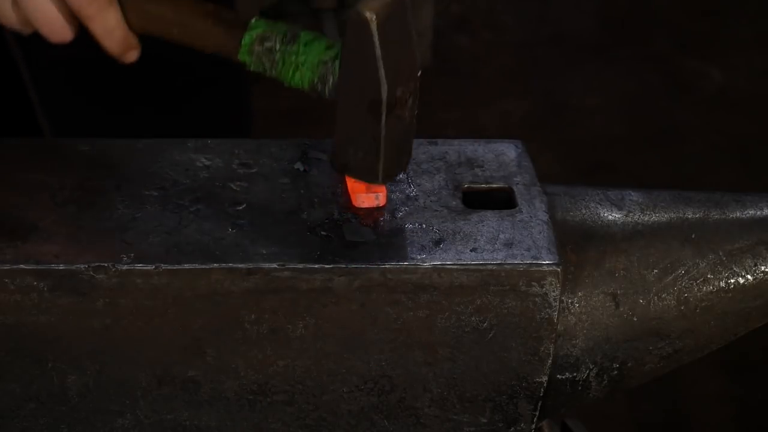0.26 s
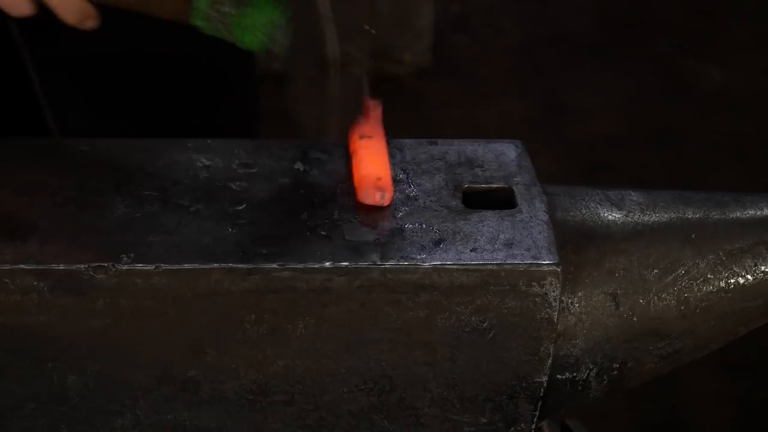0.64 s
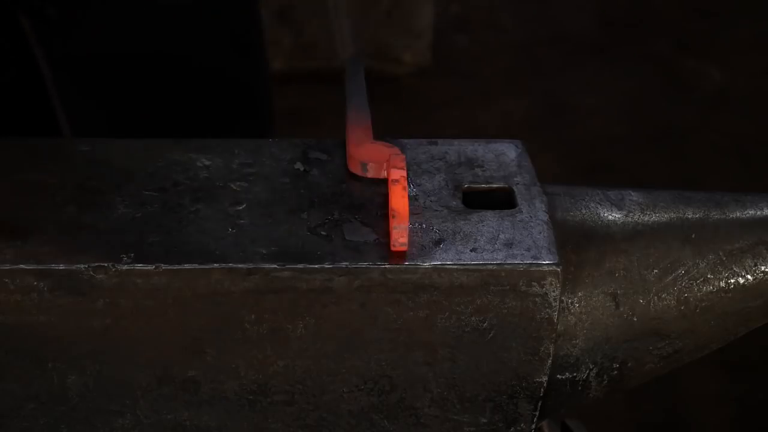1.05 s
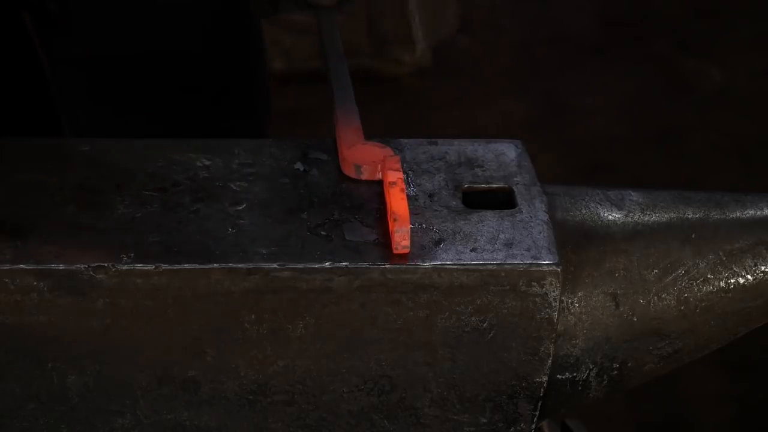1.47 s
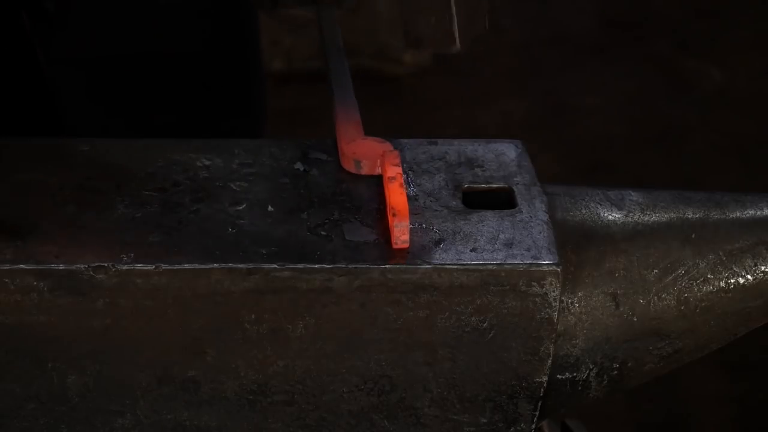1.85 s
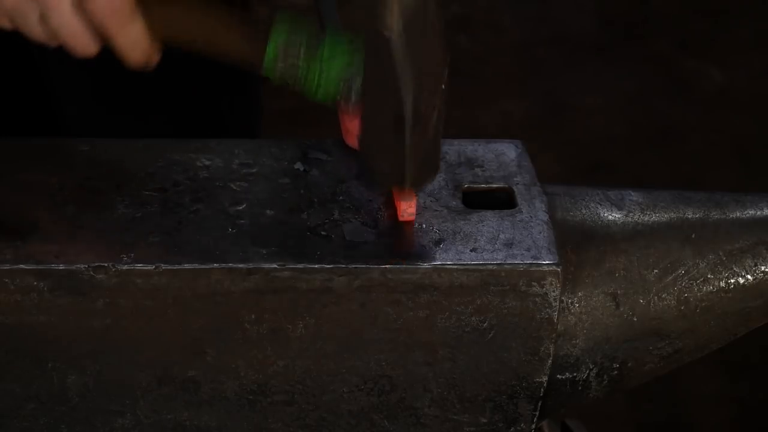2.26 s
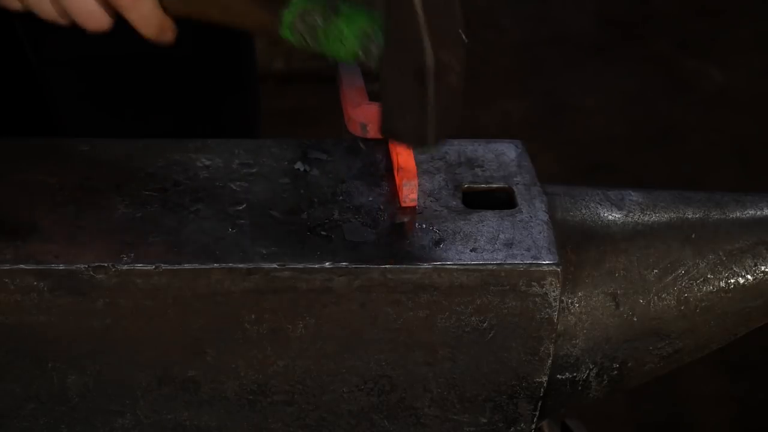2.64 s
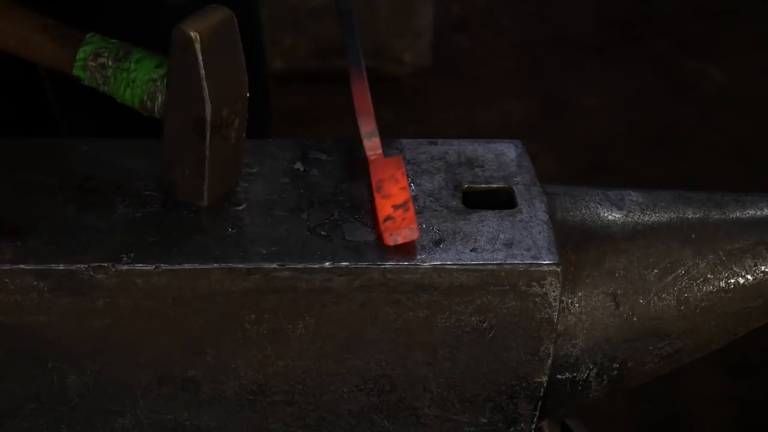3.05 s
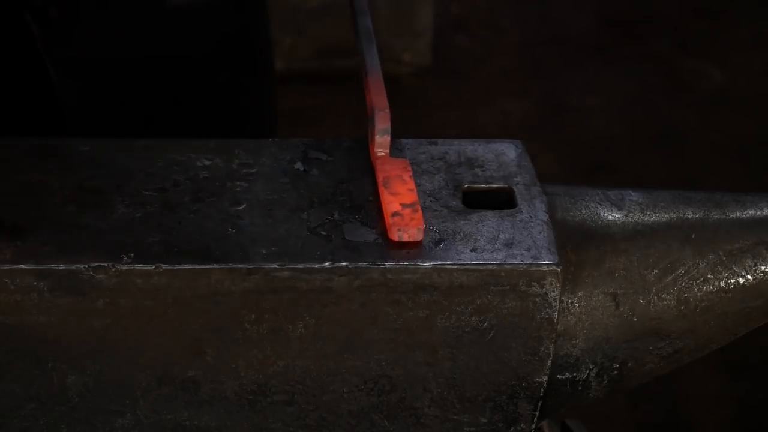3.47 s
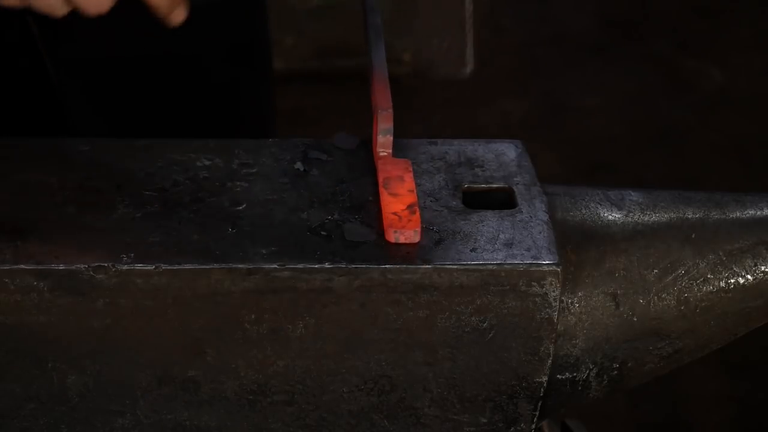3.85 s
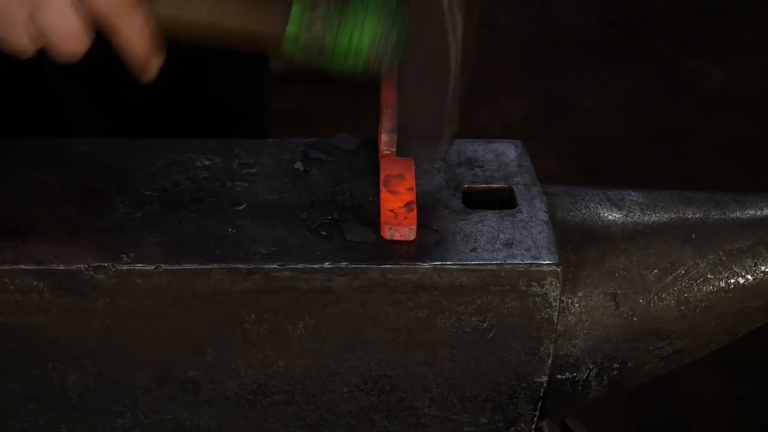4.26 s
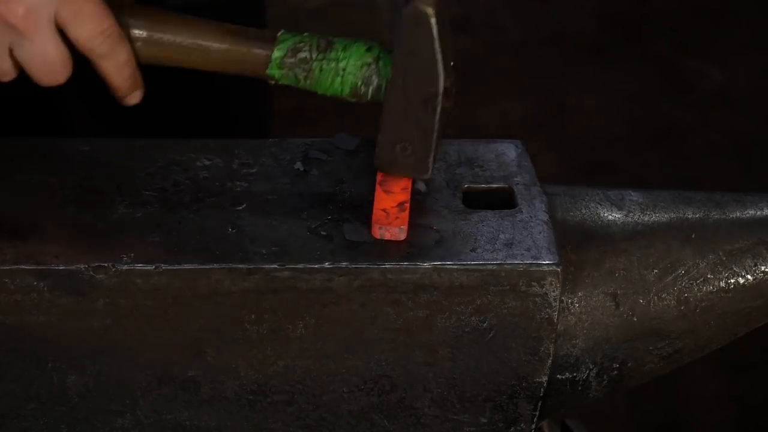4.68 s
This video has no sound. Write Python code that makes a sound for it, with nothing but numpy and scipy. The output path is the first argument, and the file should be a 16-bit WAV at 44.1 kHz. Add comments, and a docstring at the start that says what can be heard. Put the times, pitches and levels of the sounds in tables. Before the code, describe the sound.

Close, crisp hammer blows crack and clink on a glowing bar over an anvil, with short metallic ringing and quick hammer bounces in a live workshop.

```python
"""Forging at the anvil

A smith forges a glowing bar on an anvil, close to the microphone, in a fairly live workshop.
Each blow is a filtered pulse (knock), damped low modes (thud), coloured noise (crack of scale)
and a short chattering tone (clank of the pinched bar); then the anvil's modes ring.
Between runs of blows the hammer drops and bounces on the bare face, and the bar touches down.
Behind it lie low room noise, a wavering hum and one faint swell of hiss."""
import sys
import numpy as np
from scipy import signal
from scipy.fft import rfft, irfft
from scipy.io import wavfile
from scipy.ndimage import uniform_filter1d

SR = 44100
rng = np.random.default_rng(int(sys.argv[2]) if len(sys.argv) > 2 else 0)


def transcribe(u):
    """Save the signal u as a 16-bit wav file named by the first command-line argument.

    u: samples, shape (n,) or (channels, n), limited to [-1, 1]; the rate is SR.
    q: integer samples, one column per channel.
    """
    v = np.clip(np.atleast_2d(u).T, -1, 1)
    q = np.round(v * 32767).astype(np.int16)
    wavfile.write(sys.argv[1], SR, q)


N = 216619
LEAD = SR // 4  # samples kept ahead of the start, so that an earlier blow can ring into it

# spectrum of the steady workshop noise, before it is set to FLOOR_DB
# columns: frequency_hz, relative_level_db (per Hz)
FLOOR_SPECTRUM = [(25, -20.5), (45, -13.5), (75, -3), (160, -9.5), (280, -5), (520, -4.5), (1000, -12),
                  (2000, -25), (5000, -31.5), (10000, -38.5), (16000, -50)]
FLOOR_DB = -59.5  # rms


def undb(db):
    """Decibels to gain."""
    return 10 ** (np.asarray(db) / 20)


def on_log_axis(table, hz):
    """Read a spectrum between its frequencies, on a logarithmic frequency axis."""
    table = np.array(table, float)
    return np.interp(np.log(np.maximum(hz, 1)), np.log(table[:, 0]), table[:, 1])


def colour(x, table, tilt_db=0):
    """Causal minimum-phase filter with the given spectrum, tilted above 6 kHz by dB per octave."""
    size = 2048
    hz = np.maximum(np.fft.rfftfreq(size, 1 / SR), 20)
    octaves = np.log2(np.maximum(hz / 6000, 1))
    gain = undb(on_log_axis(table, hz) + tilt_db * octaves)
    # folding the cepstrum onto positive times makes the filter causal
    cepstrum = irfft(np.log(gain))
    cepstrum[1:size // 2] *= 2
    cepstrum[size // 2 + 1:] = 0
    response = irfft(np.exp(rfft(cepstrum)))
    return signal.fftconvolve(x, response)[:len(x)]


def burst(x, db):
    """Give a short sound the energy of 10 ms at this rms level."""
    return x * undb(db) * np.sqrt(SR / 10 ** 2 / np.sum(x ** 2))


def steady(x, db):
    """Give a lasting sound this rms level."""
    return x * undb(db) / np.std(x)


def fade(t, t60):
    """Exponential decay by 60 dB in t60 seconds."""
    return np.exp(-np.log(1000) * t / np.maximum(t60, 1e-4))


def ring(t, hz, t60, db, phase=0):
    """A sum of decaying modes, each a damped sine."""
    hz, t60, db, phase = (np.reshape(v, (-1, 1)) for v in (hz, t60, db, phase))
    return np.sum(undb(db) * fade(t, t60) * np.sin(2 * np.pi * hz * t + phase), axis=0)


def add(out, s, sound):
    """Mix a sound in at its time in seconds."""
    start = LEAD + int(s * SR)
    out[:, start:start + sound.shape[1]] += sound


def background(waver=0.43):
    """Low room noise, a hum whose level wavers, and a faint high hiss that swells and fades once."""
    # spectrum of the hiss; columns: frequency_hz, relative_level_db
    hiss_spectrum = [(2000, -16), (5000, -11.5), (8500, -7.5), (13500, -3.5), (16000, -18)]
    hum_hz, hum_db = 61, -66
    peak_s, peak_db, rise_db_per_s, fall_db_per_s = 1.97, -63.5, 109, 34.5
    t = np.arange(N) / SR
    swell = 1 + waver * signal.resample(rng.standard_normal(size=50), N)
    hum = steady(swell * np.sin(2 * np.pi * hum_hz * t), hum_db)
    hiss_db = peak_db - np.maximum(rise_db_per_s * (peak_s - t), fall_db_per_s * (t - peak_s))
    hiss = steady(colour(rng.standard_normal(N), hiss_spectrum), hiss_db)
    # the filter settles during the lead
    floor = steady(colour(rng.standard_normal(LEAD + N), FLOOR_SPECTRUM)[LEAD:], FLOOR_DB)
    return floor + hum + hiss


def workshop(x, build_s=0.0033):
    """Diffuse sound from the walls builds up quickly and decays by bands; two standing waves join in."""
    # reverberation bands; columns: centre_hz, t60_s, energy_db (against the sound sent in)
    room_bands = [(118.8, 1.2, -18.5), (300, 1.4, -14.5), (463, 0.783, -27.5), (700, 0.46, -18.5),
                  (1256, 0.8, -21.5), (2110, 0.75, -22.5), (4310, 0.51, -12), (8240, 0.36, -19.5),
                  (13880, 0.11, -17.5)]
    # standing waves; columns: frequency_hz, t60_s, energy_db (against the sound sent in)
    standing_waves = [(483, 1, -43.5), (528, 1, -37)]
    t = np.arange(SR) / SR
    hz = np.fft.rfftfreq(SR, 1 / SR)
    noise, response = rfft(rng.standard_normal(SR)), 0
    centres = np.log([row[0] for row in room_bands])
    # each row of the identity matrix gives one band that overlaps only its neighbours
    for share, (_, t60, db) in zip(np.eye(len(room_bands)), room_bands):
        band = irfft(noise * np.interp(np.log(hz + 1), centres, share), SR)
        shape = fade(t, t60) * (1 - np.exp(-(t / build_s) ** 2))
        response = response + undb(db) * band * shape / np.linalg.norm(shape)
    for mode_hz, t60, db in standing_waves:
        wave = ring(t, mode_hz, t60, 0)
        response = response + undb(db) * wave / np.linalg.norm(wave)
    return signal.fftconvolve(x, response)[:len(x)]


def near_echoes(sharp):
    """Knock and crack return, duller, from things close by and from a wall."""
    # columns: delay_s, gain
    reflections = [(.00305, 0.27), (.00432, -0.15), (.0054, -0.18), (0.037, .04)]
    dull = uniform_filter1d(sharp, size=14)
    return sum(gain * np.roll(dull, int(delay * SR)) for delay, gain in reflections)


def rattle(t, pulse, t60=0.024, db=-11.0):
    """Tongs, bar and stand shake for a moment after the knock: fading noise stirred by the pulse."""
    shake = rng.standard_normal(len(t)) * fade(t, t60) * np.clip(t / 0.0015, 0, 1)
    return undb(db) * signal.fftconvolve(pulse, shake / np.linalg.norm(shake))[:len(t)]


def shimmer(t, hz, db=-39, t60=0.38, scatter_db=4):
    """The many weak upper modes of anvil and hammer, woken by the crack."""
    mode_db = db + scatter_db * rng.standard_normal(len(hz))
    return ring(t, hz, t60, mode_db, rng.uniform(0, 2 * np.pi, len(hz)))


def thud(t):
    """The anvil on its stand sways in low, quickly damped modes."""
    # columns: frequency_hz, t60_s, relative_level_db
    stand_modes = [(112, 0.045, -6), (296, .04, 5), (474, 0.048, 10.5), (664, 0.021, 1)]
    return ring(t, *np.transpose(stand_modes), phase=0.86)


def anvil(t, spot, hold, scatter_db=0.5, treble_db=4.0):
    """The place of the blow decides how strongly each mode rings; hold scales how long."""
    # anvil modes before scatter, treble lift and hold; columns: frequency_hz, t60_s,
    # relative level_db struck at spot -1 (bare face), at 0 (under the bar), at 1 (nearer the horn)
    anvil_modes = [(1461, .36, -40, -51, -54), (2761, .33, -57, -53, -55), (3356, .28, -53, -58, -45),
                   (3464, .2, -30, -39, -43), (3632, .31, -37, -36, -23), (4140, .26, -49, -51, -41),
                   (4298, .3, -58, -53, -60), (5108, .19, -26, -50, -41), (6521, .33, -54, -59, -61),
                   (6705, .3, -52, -65, -53), (6925, .33, -64, -58, -51), (7105, .27, -51, -63, -54),
                   (7612, .22, -48, -59, -50), (8030, .35, -67, -60, -62), (8626, .23, -56, -58, -48),
                   (9595, .4, -67, -66, -64), (10215, .33, -66, -56, -42), (10412, .27, -73, -57, -41),
                   (10720, .05, -40, -60, -55), (10850, .3, -63, -63, -46), (12254, .33, -65, -60, -55),
                   (12405, .35, -68, -66, -58), (13062, .35, -79, -61, -69), (13436, .28, -62, -60, -58),
                   (13592, .3, -69, -66, -54)]
    hz, t60, *spots_db = np.transpose(anvil_modes)
    db = np.array([np.interp(spot, [-1, 0, 1], row) for row in np.transpose(spots_db)])
    # the weak modes, struck near their nodes, vary most from blow to blow
    db = db + scatter_db * rng.standard_normal(len(hz)) * np.clip((db.max() - db) / 10, 0, 2)
    db = db + np.interp(hz, [4000, 8000], [0, treble_db])
    return ring(t, hz, t60 * hold, db, rng.uniform(0, 2 * np.pi, len(hz)))


def clank(t, hz, t60=0.02, rough=0.4):
    """The bar, pinched between hammer and anvil, rings briefly and chatters."""
    chatter = 1 + rough * steady(uniform_filter1d(rng.standard_normal(len(t)), size=40), 0)
    return chatter * ring(t, hz, t60, 0)


def crack(t, hz, tilt_db, snap_t60=0.0082, crumble_t60=0.024, crumble_db=-8, focus=2.73, q=1.6):
    """Scale snaps and crumbles: fading noise, stressed around one broad resonance."""
    # spectrum of crushed scale; columns: frequency_hz, relative_level_db
    scale_spectrum = [(1000, -9), (2800, 2.5), (4200, 6), (5200, 8), (6500, 2), (10000, 0.5), (13500, -6),
                      (16000, -22)]
    envelope = fade(t, snap_t60) + undb(crumble_db) * fade(t, crumble_t60)
    grit = rng.standard_normal(len(t)) * envelope
    grit = grit + focus * signal.lfilter(*signal.iirpeak(hz, q, fs=SR), grit)
    return colour(grit, scale_spectrum, tilt_db)


def knock(t, contact_ms):
    """One pressure pulse as the hammer head stops; a longer contact makes it duller."""
    # spectrum of the stopping head; columns: frequency_hz, relative_level_db
    knock_spectrum = [(60, -29.5), (300, -8), (900, 0.5), (1400, 2.5), (2000, 2.5), (2450, 1), (2850, -6),
                      (3900, -1), (6000, -29), (16000, -41)]
    return colour(np.exp(-t * 10 ** 3 / contact_ms), knock_spectrum)


def strike(t, upper_hz, strength_db, contact_ms, scale_db, tilt_db, spot, crack_hz, free_db=0,
           head_hz=2250, head_t60=0.0067, head_db=-5):
    """One impact and all it wakes, as (heard close up, sent into the room)."""
    # a longer contact pushes the stand harder, wakes the anvil less and damps it sooner
    base_thud_db, thud_db_per_ms = -13, 25.5  # base against the strength
    base_ring_db, ring_at_ms, ring_db_per_doubling = 17, 0.087, -4  # base against the strength
    hold_share, hold_loss_per_ms = 1.055, 0.82
    ring_room_db = -5  # the part of the ring that is sent to the walls
    crack_db = strength_db + scale_db
    thud_db = strength_db + base_thud_db + thud_db_per_ms * contact_ms
    doublings = np.log2(contact_ms / ring_at_ms)
    ring_db = strength_db + free_db + base_ring_db + ring_db_per_doubling * doublings
    hold = hold_share - hold_loss_per_ms * contact_ms
    # on the bare face nothing cushions the hammer head, and it rings for a few cycles
    head = np.clip(-spot, 0, 1) * burst(ring(t, head_hz, head_t60, 0), strength_db + head_db)
    pulse = burst(knock(t, contact_ms), strength_db) + head
    sharp = pulse + burst(crack(t, crack_hz, tilt_db), crack_db)
    impact = sharp + near_echoes(sharp) + burst(thud(t), thud_db) + rattle(t, pulse)
    ringing = undb(ring_db) * anvil(t, spot, hold) + undb(crack_db) * shimmer(t, upper_hz)
    return np.array([impact + ringing, impact + undb(ring_room_db) * ringing])


def hammering():
    """Blows on the bar, flat or on edge; the hammer bounces on the bare face, the bar touches down."""
    # forging blows on the hot bar; columns: start_s, strength_db, contact_ms,
    # crack_db and crack_tilt_db_per_octave, clank_db (crack and clank against the strength),
    # spot (-1 bare face, 0 under the bar, 1 nearer the horn)
    blows = [(-0.075, -20.5, 0.13, -2, 7, -29, -0.57), (0.245, -19.5, 0.071, -7, 5, -12, -0.23),
             (0.558, -17, 0.084, -10.5, 4.5, -14, -0.28), (1.3791, -20.5, 0.3, -4, 12, -10, -0.23),
             (1.7258, -20.5, .24, -10, 4.5, -27, -0.028), (2.0276, -22.5, .17, -8, 5.5, -14.5, 0.17),
             (2.3084, -24, 0.2, -4.5, 0.5, -4.5, -0.17), (2.6183, -21.5, 0.22, -3.5, 5.5, -1, -0.47),
             (3.6558, -17.5, .12, -10.5, 2.5, -20.5, 0), (3.9715, -19, 0.1, -13, -4, -13.5, -0.13),
             (4.3198, -15.5, 0.1, -10, -1, -11, 0.56), (4.6944, -15, 0.054, -11, 1.5, -9, 0.5)]
    # the hammer drops and bounces on the bare face; columns: start_s, strength_db, contact_ms,
    # crack_db (against the strength), spot (as above)
    drops = [(0.7973, -19, 0.037, -13, -0.71), (0.878, -30, 0.063, -10, -0.96),
             (2.895, -20, 0.046, -10, -0.78), (3.0283, -24.5, 0.035, -7, -1.3),
             (3.0855, -37, 0.09, -22, -1.9)]
    # the bar itself touches down on the face; columns: start_s, strength_db, contact_ms,
    # crack_db (against the strength)
    taps = [(1.018, -41.5, .04, 8.5), (1.056, -51, 0.061, -1.5), (3.37, -72, 0.038, -1),
            (3.522, -78.5, 0.024, 5), (4.7363, -38, 0.23, -4)]
    # the bar is struck on its edge between these times, otherwise flat; columns: start_s, end_s
    edge_times = (1.2, 3.2)
    # the crack is centred by what is struck; the taps share the pitch of the bar on edge
    flat_crack_hz, edge_crack_hz, bare_crack_hz = 10200, 7300, 4425
    drop_tilt_db, tap_tilt_db = -8.5, 7.5  # tilt of the crack, dB per octave
    flat_clank_hz, edge_clank_hz = 4350, 5940
    clank_room_db = -10  # the small bar is heard close up and stirs the room little
    tap_spot, tap_ring_db = 0.2, 6.5  # with no hammer on it the anvil rings more freely

    out, t = np.zeros((2, LEAD + N + SR)), np.arange(SR // 2) / SR
    upper_hz = rng.uniform(5500, 13000, size=44)
    for s, strength_db, contact_ms, scale_db, tilt_db, clank_db, spot in blows:
        on_edge = edge_times[0] < s < edge_times[1]
        crack_hz = edge_crack_hz if on_edge else flat_crack_hz
        clank_hz = edge_clank_hz if on_edge else flat_clank_hz
        add(out, s, strike(t, upper_hz, strength_db, contact_ms, scale_db, tilt_db, spot, crack_hz))
        bar = burst(clank(t, clank_hz), strength_db + clank_db)
        add(out, s, np.array([bar, undb(clank_room_db) * bar]))
    for s, strength_db, contact_ms, scale_db, spot in drops:
        add(out, s, strike(t, upper_hz, strength_db, contact_ms, scale_db, drop_tilt_db, spot,
                           bare_crack_hz))
    for s, strength_db, contact_ms, scale_db in taps:
        add(out, s, strike(t, upper_hz, strength_db, contact_ms, scale_db, tap_tilt_db, tap_spot,
                           edge_crack_hz, tap_ring_db))
    return out[:, :LEAD + N]


def scene(side_db=-20, floor_side_db=-25, mismatch=0.011):
    """Nearly mono: traces of room, noise and treble, and the microphones' hiss, part left from right."""
    mic_hiss_db = -78
    direct, sent = hammering()
    mid = (direct + workshop(sent))[LEAD:] + background()
    air = steady(colour(rng.standard_normal(N), FLOOR_SPECTRUM), FLOOR_DB + floor_side_db)
    room_side = undb(side_db) * workshop(sent)[LEAD:]
    # the slope of the signal stresses its treble
    side = room_side + air + mismatch * np.gradient(mid)
    mic_hiss = undb(mic_hiss_db) * rng.standard_normal((2, N))
    return np.array([mid + side, mid - side]) + mic_hiss


def record(dry, ceiling=0.51):
    """The recorder rounds the highest peaks and cuts the top."""
    top_hz = 16200
    rounded = ceiling * np.tanh(dry / ceiling)
    return signal.sosfilt(signal.ellip(8, .2, 70, top_hz, fs=SR, output="sos"), rounded)


dry = scene()
out = record(dry)
transcribe(out)
```